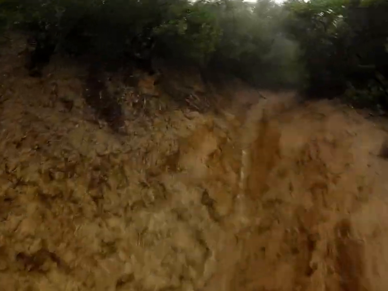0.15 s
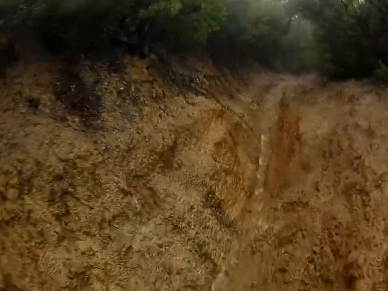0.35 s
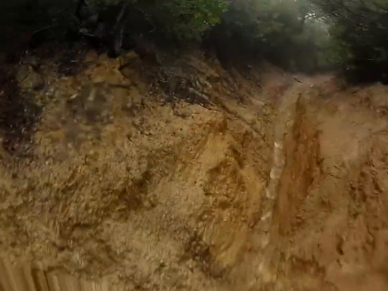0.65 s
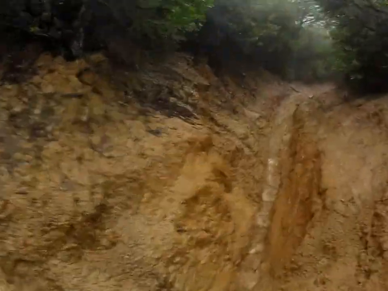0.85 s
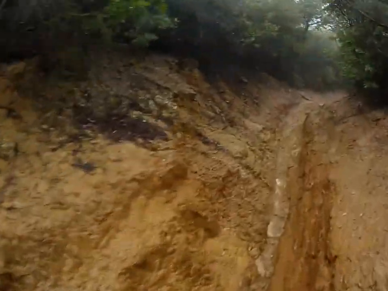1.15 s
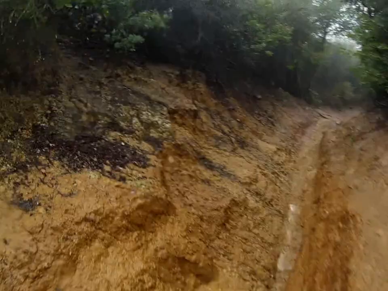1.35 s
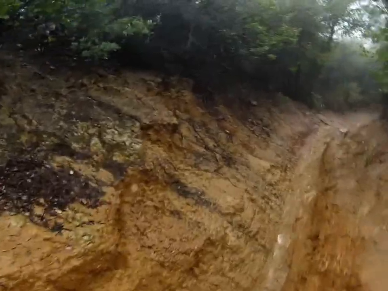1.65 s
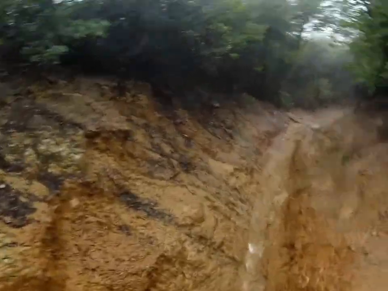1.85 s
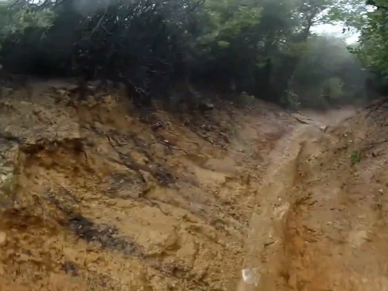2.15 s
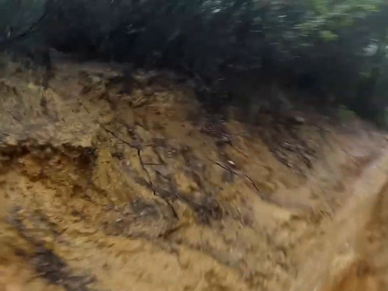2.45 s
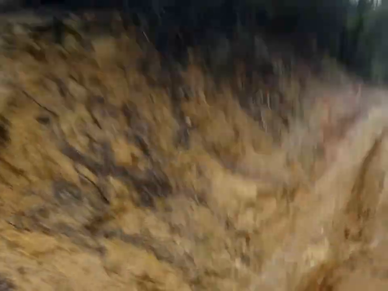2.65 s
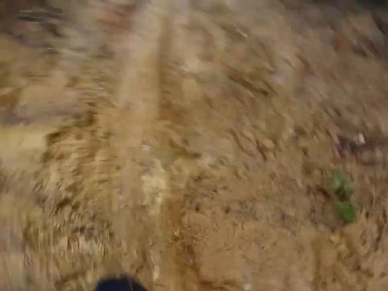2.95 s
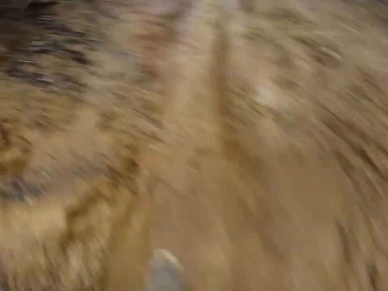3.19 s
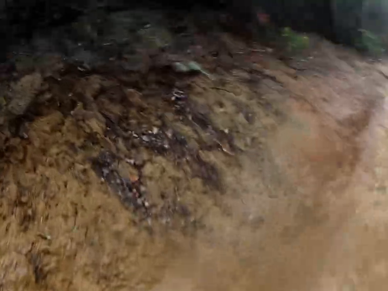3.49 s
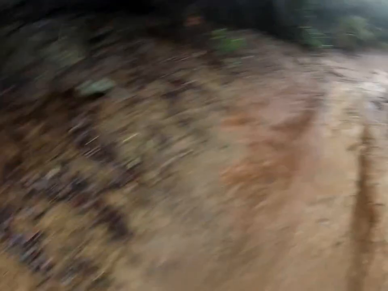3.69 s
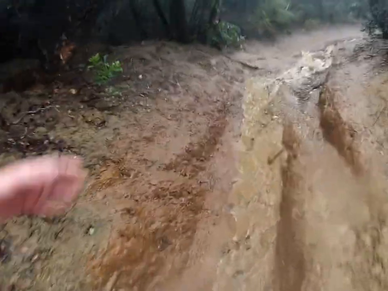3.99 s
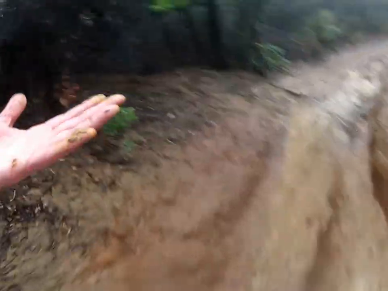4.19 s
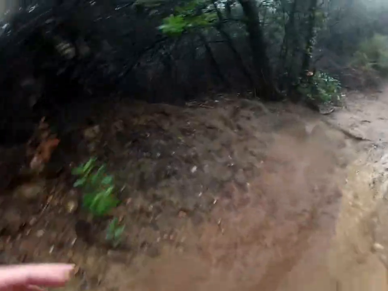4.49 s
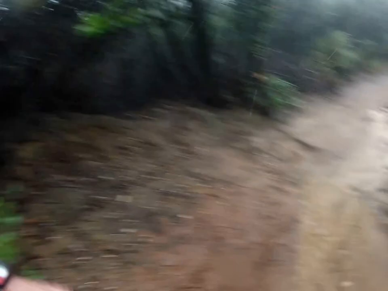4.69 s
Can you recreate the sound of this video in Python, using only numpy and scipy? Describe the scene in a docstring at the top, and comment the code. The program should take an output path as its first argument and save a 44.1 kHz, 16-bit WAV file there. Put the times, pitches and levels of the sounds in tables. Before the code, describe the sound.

Close, nearly mono sound from inside a waterproof case: irregular muddy footfalls splash and squelch outdoors over quiet, patchy rain. Small hollow taps from drops and thrown mud dot the steps, with one sharp tap early, a busy wet cluster midway, and a very hard double knock at about 3.6 seconds. Soft low thumps and rumble come from the shaken case; lighter splashes finish.

```python
"""Shoes splash and squelch as a runner climbs a muddy trail in the rain, a small camera shut in a waterproof case.
Slaps and rain are grains of random impacts, filtered by the case or by the sucking mud. Drops striking the case
excite decaying modes of its shell and inner air. Wind and strides shake it, as low noise and single pushes.
The microphone is sampled coarsely and held, so the treble is a mirror of the low band."""
import sys
import numpy as np
from scipy import signal
from scipy.fft import rfft, irfft, next_fast_len
from scipy.io import wavfile
from scipy.ndimage import uniform_filter1d, map_coordinates

SR = 44100
rng = np.random.default_rng(int(sys.argv[2]) if len(sys.argv) > 2 else 0)


def file_out(sig):
    """Save sig as 16-bit WAV at sys.argv[1]."""
    # one column per channel
    cols = np.atleast_2d(sig).T
    # limit, then scale
    lim = np.clip(cols, -1, 1)
    pcm = np.round(lim * 32767).astype(np.int16)
    wavfile.write(sys.argv[1], SR, pcm)


N = 213081

# Outside air heard through the case. Each row: frequency in Hz, relative gain in dB.
CASE_GAIN = [(290, -30), (500, -24.5), (774, -18.5), (1270, -10.5), (1600, -19.5), (1830, -1), (1990, 3.5),
             (2330, -2), (2780, -19), (3050, -17), (3680, -1), (4210, -20), (5240, -16), (6000, -30.5),
             (7800, -90), (13200, -120)]


def amp(db):
    """A level in dB is twenty times the logarithm of an amplitude ratio; this returns the ratio."""
    return 10 ** (np.asarray(db) / 20)


def unit(x):
    """Division by the root mean square gives a signal an rms of 1."""
    return x / np.sqrt(np.mean(x ** 2) + 1e-20)


def along(points, hz):
    """Gain interpolated on a logarithmic frequency axis, with -100 dB beyond the end points."""
    f, v = np.transpose(points)
    return np.interp(np.log(hz + 1), np.log(f + 1), v, left=-100, right=-100)


def curves(rows):
    """Linear interpolation in time: one value per sample for each column after the time."""
    times, *columns = np.transpose(rows)
    return [np.interp(np.arange(N) / SR, times, column) for column in columns]


def wobble(rate):
    """Slow fluctuation: a spline through random knots, rate of them a second."""
    knots = rng.standard_normal(int(N * rate / SR) + 4)
    return map_coordinates(knots, [np.arange(N) * rate / SR])


def filtered(x, response):
    """Linear filtering: the spectrum times a complex response of frequency."""
    m = 2 * next_fast_len(N // 2 + 4096)
    return irfft(rfft(x, m) * response(np.fft.rfftfreq(m, 1 / SR)), m)[..., :N]


def coloured(x, points):
    """Minimum-phase filtering: folding the cepstrum makes the filter with this gain causal."""
    def response(hz):
        cepstrum = irfft(np.log(amp(along(points, hz))))
        cepstrum[1:len(hz) - 1] *= 2
        cepstrum[len(hz):] = 0
        return np.exp(rfft(cepstrum))
    return filtered(x, response)


def droplets(per_second, spread_db):
    """Shot noise: tiny impacts at random moments, a few much larger than the rest; rms 1."""
    hit = rng.random(N) < per_second / SR
    size = amp(spread_db * rng.exponential(size=N))
    return unit(hit * size * rng.standard_normal(N))


def patchy(x, depth_db):
    """Time-frequency modulation: louder and softer patches some 6 ms long and 1 kHz wide."""
    spectrum = signal.stft(x, nperseg=128)[2]
    patches = uniform_filter1d(rng.standard_normal(spectrum.shape), 3, 0)  # across frequency
    patches = uniform_filter1d(patches, 4, 1)  # across time
    return signal.istft(spectrum * amp(depth_db * unit(patches)), nperseg=128)[1][:N]


def rain():
    """Superposed random impacts: far rain and runnels merge into hiss, nearer drops stand out; both clump."""
    # Wet ground and rain. Each row: time in seconds, rms level in dB.
    patter = [(0.0, -49), (0.44, -51), (0.55, -49.5), (0.86, -52), (1.47, -45.5), (1.63, -52.5),
              (1.84, -52.5), (2.03, -46.5), (2.25, -51), (2.45, -46.5), (2.58, -46.5), (2.69, -51),
              (3.38, -44.5), (3.65, -49), (3.81, -52), (4.45, -54), (4.67, -49.5), (4.83, -52)]
    level_db, = curves(patter)
    hiss = rng.standard_normal(N) + amp(-7.5) * droplets(500, spread_db=0.5)
    clumps = amp(2.1 * wobble(12) + 1.5 * wobble(77))
    heard = coloured(patchy(hiss * clumps, depth_db=2.0), CASE_GAIN)
    return amp(level_db) * unit(heard)


def jolts():
    """Impulse and rebound: the case lurches on its strap, a short push with a slower swing back."""
    # Each row: start in seconds, peak level in dB, signed strength as a factor, time constant in seconds.
    lurches = [(0.274, -27, 0.85, 0.0046), (0.326, -27, 1, 0.0028), (1.053, -34, 0.52, 0.0037),
               (1.388, -32, 0.34, 0.0032), (4.339, -41.5, -0.7, 0.0041)]
    out = np.zeros(N + SR)
    for s, db, sign, length in lurches:
        u = np.arange(SR // 8) / SR / length
        push = u ** 2 * (2.4 - u) * np.exp(-u)
        out[round(s * SR):][:len(u)] += sign * amp(db) * push / push.max()
    return out[:N]


def shake():
    """Low-frequency noise: wind and strides rock the case; weak independent noise parts the channels."""
    # Wind and stride shake. Each row: time in seconds, rumble level in dB, rocking level in dB.
    shaking = [(0.0, -51, -50.5), (0.17, -51.5, -74), (0.34, -39, -51), (0.42, -49, -70),
               (0.55, -37.5, -59), (0.78, -63, -74), (0.85, -48, -59), (1.28, -51, -64), (1.36, -46, -52.5),
               (1.65, -58, -70), (2.0, -41, -58), (2.22, -54.5, -77), (2.43, -50, -58.5),
               (2.91, -46.5, -60), (3.11, -51, -64), (3.27, -49, -82), (3.3, -57, -65), (3.52, -44.5, -60),
               (3.55, -55, -49), (3.66, -58.5, -68), (3.98, -51.5, -60), (4.21, -68, -75), (4.33, -48, -60),
               (4.53, -69, -70), (4.79, -50, -59), (4.83, -58.5, -64)]
    # Spectra of the three layers. Each row: frequency in Hz, relative gain in dB.
    rumble_gain = [(10, -6.5), (25, -1), (45, -5), (65, -15), (100, -24.5)]
    rocking_gain = [(35, -24.5), (60, -1.5), (100, -7.5), (150, -19.5)]
    flutter_gain = [(60, -31), (120, -2), (280, -4), (600, -14.5), (1000, -40)]
    rumble_db, rocking_db = curves(shaking)
    gusts_db = 2.5  # depth of the quick gusts in all three layers
    layers = [  # mid level in dB, spectrum, gust knots a second, side relative to mid in dB
        (rumble_db, rumble_gain, 8, -22),
        (rocking_db, rocking_gain, 14, -18),
        (-62, flutter_gain, 30, -16)]
    mid, side = jolts(), np.zeros(N)
    for level_db, gain, rate, side_db in layers:
        gusts = amp(gusts_db * wobble(rate))
        pair = coloured(rng.standard_normal((2, N)) * gusts, gain)
        mid = mid + amp(level_db) * unit(pair[0])
        side = side + amp(level_db + side_db) * unit(pair[1])
    return mid, side


def spatter(envelope, colour, shared):
    """Granular excitation of a filter: shared and separate droplets, uneven in time and frequency."""
    grit = patchy(.7 * shared + droplets(2500, spread_db=2.2), depth_db=3.3)
    steady, shaped = coloured(np.array([grit, grit * envelope]), colour)
    return shaped / np.std(steady)  # the envelope alone sets the level


def footsteps():
    """Impact and exponential decay: each slap throws coarse and fine spray and makes the mud suck."""
    # Slaps of shoe and thrown mud. Each row: start in seconds, nominal spray level in dB,
    # squelch under it in dB (ahead of the common squelch gain), fine spray under it in dB, 60 dB decay in seconds.
    slaps = [(0.025, -41, 1, 3, 0.097), (0.217, -30, -4, -4, 0.18), (0.236, -20.5, -1.5, -6.5, 0.079),
             (0.314, -34.5, -4, -5, 0.089), (0.514, -32.5, -9, -0.5, 0.15), (0.541, -30.5, 2, -5, 0.07),
             (0.867, -35.5, -4, 2, 0.27), (0.89, -28.5, -3.5, -20, 0.093), (0.909, -26.5, -34, -15, 0.095),
             (0.95, -39, -22, -8.5, 0.28), (1.232, -32.5, -5.5, 0.5, 0.27), (1.275, -30, -23, -10, 0.22),
             (1.306, -34, -15, -10, 0.072), (1.416, -40, -15, 1, 0.086), (1.852, -37, -3, -7.5, .3),
             (1.889, -30, -22, -7, 0.18), (1.917, -31.5, -25, -24, 0.057), (2.408, -30.5, -1, -4.5, 0.093),
             (2.427, -14.5, -12, -6.5, 0.038), (2.442, -17, -8, -4, 0.057), (2.453, -17, -27, -5, 0.081),
             (2.488, -30, -25, -4, 0.053), (2.595, -42, -9, -1, 0.26), (2.683, -37.5, -9, 1.5, 0.082),
             (2.863, -32.5, -14, -5, 0.2), (2.882, -20.5, -14, -7.5, 0.13), (2.907, -29, -13.5, -10, 0.2),
             (2.976, -29, -20, -4, 0.077), (3.182, -23.5, 2.5, -6, 0.027), (3.248, -45, -8, 7, 0.044),
             (3.344, -32.5, -11, 4.5, .08), (3.364, -17, -15, -6.5, 0.058), (3.388, -40, -25, 5.5, 0.12),
             (3.474, -31.5, -19, -14, 0.083), (3.734, -32, -15, -10.5, 0.096), (3.766, -28, -27, -6, .1),
             (3.793, -22, -29, -9, .06), (3.813, -37.5, -26, -9, 0.24), (4.218, -27, -4, -3, 0.05),
             (4.232, -28.5, -14, -4, .09), (4.264, -38.5, -22, -5, 0.13), (4.43, -35, -20.5, -1, 0.054),
             (4.586, -34, -7, 1, 0.15), (4.617, -29.5, -7, 2, 0.068), (4.646, -20, -16.5, -2, 0.077)]
    # Mud sucking. Each row: frequency in Hz, relative gain in dB.
    squelch_gain = [(90, -11.5), (200, 3.5), (450, -5), (800, -58), (1150, -1), (1500, -34), (1800, 10)]
    rise_s, rise_share = 0.0023, 0.011  # swell time constant: a base plus a share of the decay time
    coarse_power, fine_power, suck_power = np.zeros((3, N + SR))
    t = np.arange(SR // 2) / SR
    for s, db, squelch_db, fine_db, t60 in slaps:
        rise = (1 - np.exp(-t / (rise_s + rise_share * t60))) ** 2
        swell = amp(db - 60 * t / t60) * rise
        for power, share_db in ((coarse_power, 0), (suck_power, squelch_db), (fine_power, fine_db)):
            power[round(s * SR):][:len(t)] += (swell * amp(share_db)) ** 2  # overlapping slaps add in power
    shared = droplets(4000, spread_db=2) * amp(2.5 * wobble(120))
    low = [p for p in CASE_GAIN if p[0] < 3100] + [(3600, -60)]  # coarse spray rings the lower case resonances
    high = [(2300, -60)] + [p for p in CASE_GAIN if p[0] > 2700]
    coarse = spatter(np.sqrt(coarse_power[:N]), low, shared)
    fine = spatter(np.sqrt(fine_power[:N]), high, shared)
    suck = spatter(np.sqrt(suck_power[:N]), squelch_gain, shared)
    return coarse + fine + amp(-8.0) * suck


def drops():
    """Modal excitation: hard blows favour high shell modes, heavy ones low; the air's pitch follows the spot."""
    # Drops and flung mud striking the case. Each row: time in seconds (sounding 2 ms later), peak of the ring
    # in dB, # hardness in octaves above 1 kHz, weight on the low modes in dB, nominal inner air frequency in
    # Hz, # inner air level over the strongest shell mode in dB, inner air 60 dB decay in seconds.
    strikes = [(0.095, -40, 3, 0, 1820, 3, 0.013), (0.18, -34, 2.2, 4, 2410, -3, 0.015),
               (0.287, -33, -0.3, -1, 2290, -20, .012), (0.308, -32, 0.6, 15, 1970, -18, .015),
               (0.397, -11.5, 1, 1.5, 2200, 1.5, 0.011), (0.619, -31, 2.3, 15, 2050, 1.5, 0.022),
               (0.746, -27, 0.94, -6, 2280, 5.5, 0.012), (0.799, -30, -7, 0, 2020, 23, 0.021),
               (1.024, -35, 1.5, 7, 1990, 5, .011), (1.127, -30.5, 1.4, 14.5, 2040, 5, 0.0074),
               (1.595, -30, 1.3, 7, 2130, -3.5, .015), (1.636, -28, -3.5, 5, 1970, 16, 0.028),
               (1.898, -24, 2.3, 8, 2140, -6, .013), (2.015, -26, 1.2, 12, 2310, 1.5, 0.01),
               (2.07, -33.5, 2.5, 0, 2080, 9, 0.0076), (2.165, -35, -0.5, -10, 2050, 9.5, 0.011),
               (2.193, -37, -1, 0, 2210, 18, 0.017), (2.27, -27.5, 2.8, 5, 1940, -8.5, 0.023),
               (2.43, -18, -0.9, -12, 2040, 11, 0.032), (2.455, -13, 1.3, -7, 2023, 12, 0.04),
               (2.532, -28, -0.2, 5, 1894, -7, 0.017), (2.717, -24.5, 1.3, 0, 2220, 2.5, 0.0096),
               (2.794, -40, -0.5, -5, 2160, -4, .015), (2.886, -13.5, 0.4, -10, 2070, 6.5, 0.017),
               (3.066, -33, .5, 3, 2120, 2, .015), (3.1117, -8, 1.03, 18, 1940, 0.5, 0.0082),
               (3.142, -29.5, 0, 6, 1930, -11, .015), (3.171, -21, .3, 8, 1940, -1.5, 0.0083),
               (3.191, -28.5, -0.03, 13, 1900, -16, 0.012), (3.235, -28, 2, 12, 1930, 10, .011),
               (3.27, -29, -.5, 5, 1830, -1, 0.0083), (3.299, -27, .5, -15, 1920, -3.5, .017),
               (3.368, -21, .6, 16, 1865, -6, 0.021), (3.5545, -0.5, .8, -11, 2270, 3, 0.0076),
               (3.5635, -2.5, 1.32, 4.5, 2220, 0.5, 0.0096), (3.613, -37.5, 2.6, 0, 1980, -11, 0.014),
               (3.687, -34.5, 2.6, -4, 2240, 2, 0.035), (3.773, -19.5, 0.5, 8, 2096, 9, 0.022),
               (4.071, -33, 0.96, -6, 1880, 3, 0.015), (4.201, -34.5, .9, 5, 1930, 10, 0.018),
               (4.422, -34.5, 2.6, 6, 1890, -20, .015), (4.484, -34.5, 2, -5, 1900, -1, 0.027)]
    # Case modes. Each row: nominal frequency in Hz, 60 dB decay in seconds, relative level in dB.
    shell_modes = [(308, .007, 7), (892, 0.0036, 1.5), (1290, 0.013, -1), (2915, 0.01, -6.5),
                   (3540, 0.012, 0), (4330, 0.0057, -1.5)]
    low_hz = 1000
    narrow_db = 7  # loss of a mode one octave off the hardness, growing with the square
    scatter_db, detune_share = 1.5, 0.02  # chance spread of each mode's level and pitch
    shove_db, shove_s = -25, .0007  # a blow also pushes the case whole, once
    out, crack = np.zeros((2, N + SR))
    t = np.arange(SR // 20) / SR
    chance = rng.standard_normal((len(strikes), 2, len(shell_modes) + 1, 1))
    for strike, (detune, scatter) in zip(strikes, chance):
        s, db, hardness, weight_db, air_hz, air_db, air_t60 = strike
        modes = []
        for hz, t60, level in shell_modes:
            mismatch = np.log2(hz / 1000) - hardness
            modes.append((hz, t60, level + weight_db * (hz < low_hz) - narrow_db * mismatch ** 2))
        strongest_db = max(mode[2] for mode in modes)
        modes.append((air_hz, air_t60, strongest_db + air_db))
        hz, t60, mode_db = np.transpose(modes)[:, :, None]
        decay = amp(mode_db + scatter_db * scatter - 60 * t / t60)
        tones = decay * np.sin(2 * np.pi * hz * (1 + detune_share * detune) * t)
        ring = tones.sum(axis=0) * (1 - np.exp(-t / .00017)) ** 2
        shove = amp(shove_db) * t / shove_s * np.exp(1 - t / shove_s)
        start = round((s + .002) * SR)  # each drop sounds 2 ms after its listed time
        out[start:][:len(t)] -= amp(db) * (ring / np.abs(ring).max() + shove)
        crack[start:][:len(t)] += amp(db - 12 - 60 * t / .007)  # the drop bursts
    burst = signal.butter(3, [700, 4200], "band", fs=SR, output="sos")
    return out[:N] + signal.sosfilt(burst, crack[:N] * rng.standard_normal(N))


def scene():
    """Superposition at one capsule inside the case, which feeds both channels as mid plus and minus side."""
    mid, side = shake()
    mid = mid + rain() + footsteps() + drops()
    return np.array([mid + side, mid - side])


def record(dry):
    """Sampling mirrors the band about the sampling rate; holding each value weights it by a sinc."""
    # Output stage. Each row: frequency in Hz, gain in dB.
    rolloff = [(5000, 0), (15230, 0), (15380, -32), (16400, -26)]
    hold_hz, top_hz = 12000, 16460  # sampling rate; upper band limit
    bounded = dry / (1 + np.abs(dry / .8) ** 6) ** (1 / 6)  # the capsule saturates on the hardest blows
    guard = signal.cheby2(8, 40, .6 * hold_hz, fs=SR, output="sos")
    band = signal.sosfilt(guard, bounded)
    sampled = band * (1 + 2 * np.cos(2 * np.pi * hold_hz * np.arange(N) / SR))  # the band and its first images

    def hold_response(hz):
        return np.sinc(hz / hold_hz) * amp(np.interp(hz, *np.transpose(rolloff)))
    held = filtered(sampled, hold_response)
    return filtered(held, lambda hz: hz < top_hz)


dry = scene()
out = record(dry)
file_out(out)
```